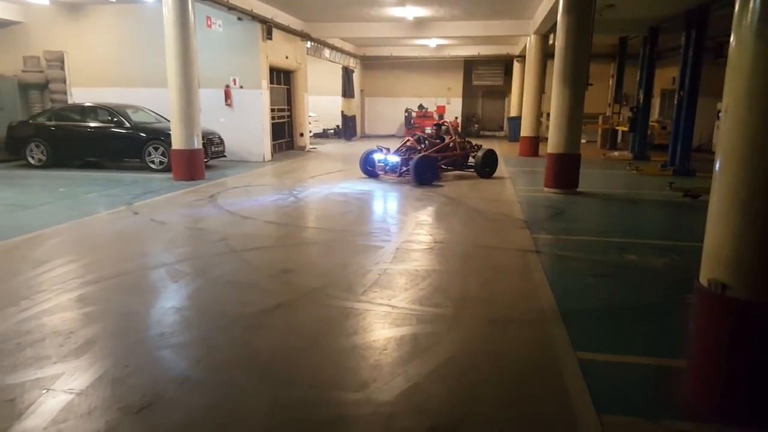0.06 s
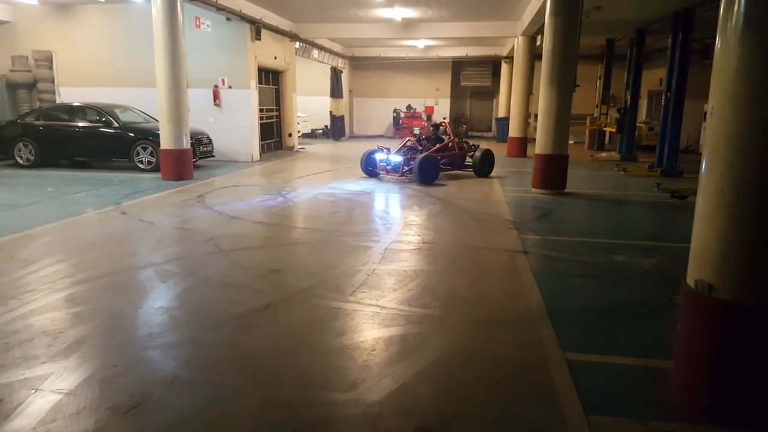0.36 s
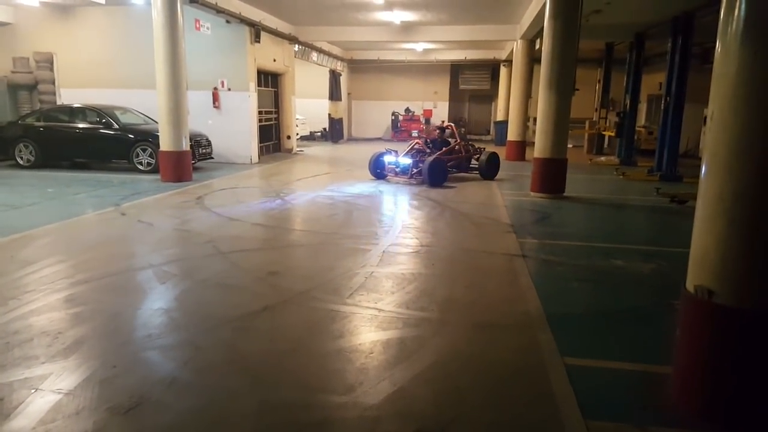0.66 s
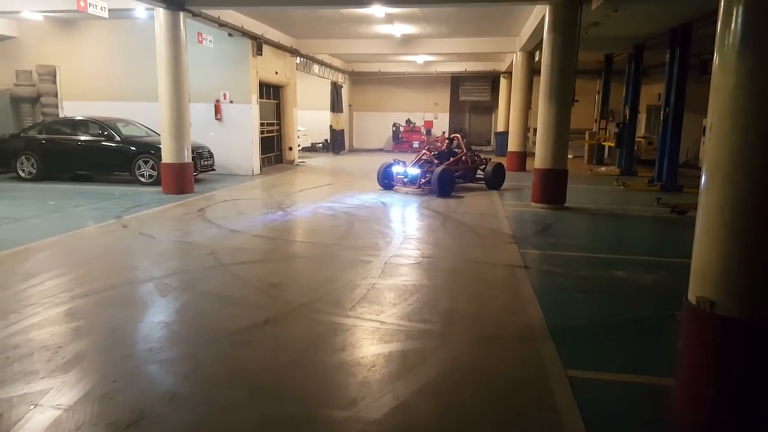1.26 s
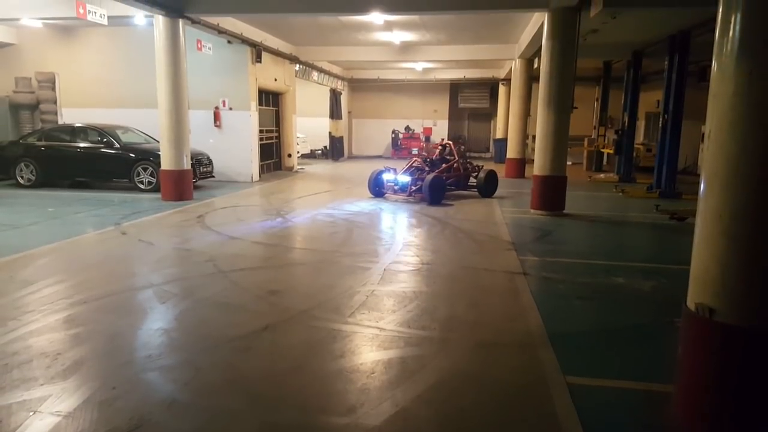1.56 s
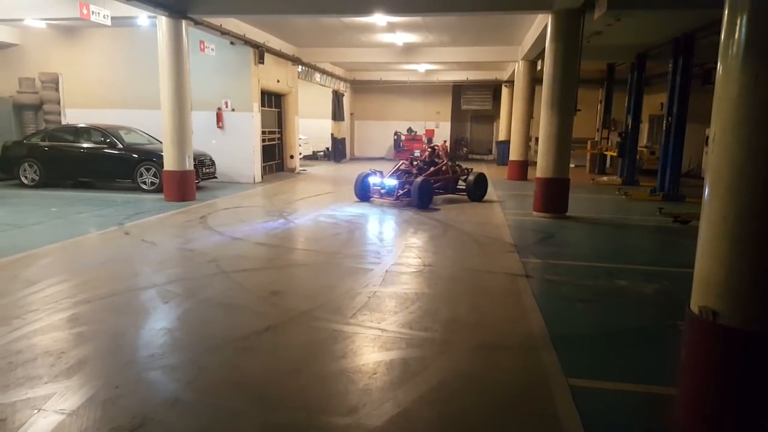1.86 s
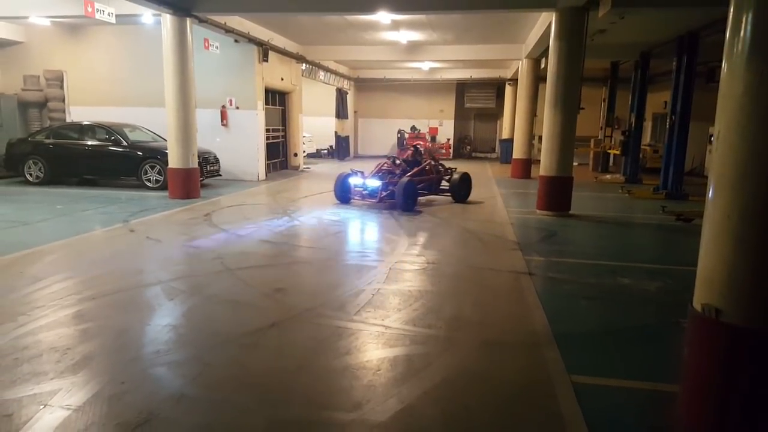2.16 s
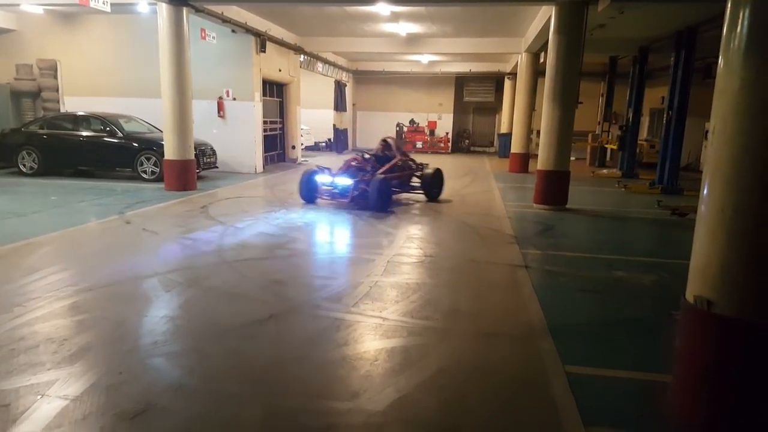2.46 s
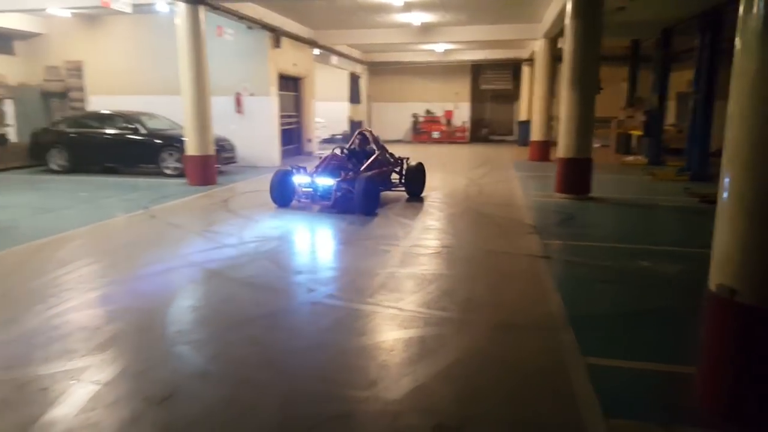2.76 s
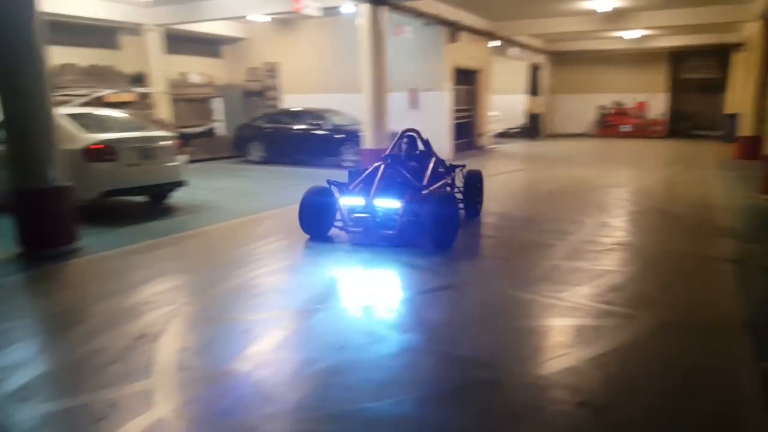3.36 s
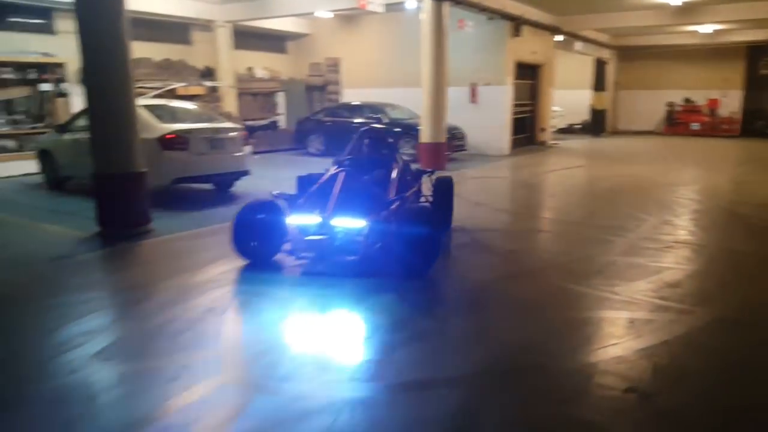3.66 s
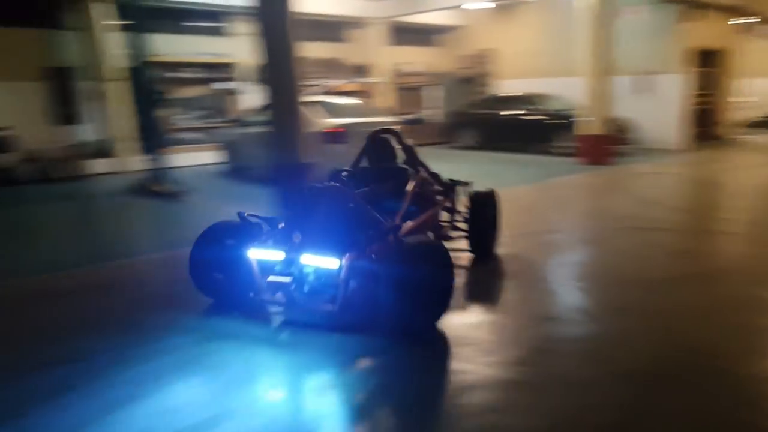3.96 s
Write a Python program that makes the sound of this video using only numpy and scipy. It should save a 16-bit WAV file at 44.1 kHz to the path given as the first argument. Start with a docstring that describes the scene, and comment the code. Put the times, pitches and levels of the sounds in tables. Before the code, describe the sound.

A buggy engine idles lumpily in a concrete garage, then barks and revs up, growing louder. Its tyres chirp and break into a shrill, wavering squeal as it turns towards the microphone, everything echoing.

```python
"""A lumpy four-cylinder idle fills a concrete garage while an earlier tyre squeal rings away.
The open buggy barks as its throttle opens, then revs up and grows louder, its firing pulses
booming and rasping in the exhaust over clatter and hiss. Pulling away in a tight turn, its tyres
stick and slip on the smooth floor: pure chirps and a shrill, wavering squeal that the hard room
smears into a band, with rubber scrub rising underneath."""
import sys
import numpy as np
from scipy import signal
from scipy.fft import rfft, irfft, next_fast_len
from scipy.io import wavfile
from scipy.ndimage import uniform_filter1d, minimum_filter1d

SR = 44100
rng = np.random.default_rng(int(sys.argv[2]) if len(sys.argv) > 2 else 0)


def dump(signal):
    """Clip the signal to [-1, 1] and save it as 16-bit WAV at the path in sys.argv[1]."""
    limited = np.clip(np.atleast_2d(signal).T, -1, 1)
    pcm = np.round(limited * 32767).astype(np.int16)
    wavfile.write(sys.argv[1], SR, pcm)


N = 176400

# rev curve: t/s, firing rate f/Hz, firing tone level/dB, octave level/dB
REVS = [(0, 59.03, -32, -47), (.42, 49.75, -40, -36), (1.0, 49.99, -34, -42), (1.4, 52.34, -34, -21),
        (1.6, 56.1, -44, -24.5), (2.04, 63.84, -32, -24), (2.13, 68.06, -30, -16), (2.2, 74, -31.5, -26),
        (2.3, 79.94, -29.5, -26.5), (2.6, 96, -28.5, -19), (2.83, 113.1, -20, -25.5),
        (2.95, 108.1, -29, -26.5), (3.22, 104.7, -10.5, -18.5), (3.42, 106.8, -24.5, -18),
        (3.7, 110, -21.5, -27), (4, 116.9, -13.5, -26.5)]
# accent of each cylinder in firing order: level/dB
CYLINDER_ACCENTS = [0.5, -5, 0.5, 1]
# engine harmonics that flare briefly: t/s, multiple of the firing rate, level/dB
FLARES = [(2.91, 5, -15), (3.08, 3, -18.5), (3.635, 5, -17.5), (3.726, 5, -16), (3.855, 3, -14.5)]
# exhaust boom envelope: t/s, level/dB
BOOM_ENVELOPE = [(0, -25.5), (.8, -24.5), (1.12, -21.5), (1.44, -16), (1.62, -16), (1.78, -24.5),
                 (2.3, -20), (4, -33.5)]
# engine load, ahead of the trims: t/s, rasp level/dB, clatter level/dB
LOAD = [(0, -34.5, -37.5), (.8, -36, -39), (1.42, -24, -29), (1.8, -28.5, -38), (2.05, -25.5, -35.5),
        (2.42, -15.5, -31), (2.95, -12.5, -27), (3.25, -16.5, -28), (4, -14.5, -27)]
# treble hiss envelope: t/s, level/dB
HISS_ENVELOPE = [(0, -60), (.55, -65), (.68, -52), (.95, -66.5), (1.42, -47.5), (1.8, -56.5), (4, -55)]
# EQ curves of exhaust boom, exhaust rasp, mechanical clatter and hiss: f/Hz, level/dB
BOOM_EQ = [(22, -31.5), (55, -3), (100, -2), (155, 3.5), (195, -5.5), (260, -7.5), (3000, -130)]
RASP_EQ = [(120, -48), (240, -5), (330, 0.5), (550, -1), (760, -6.5), (900, -18), (4000, -76)]
CLATTER_EQ = [(200, -28.5), (700, 0.5), (1800, 0), (4300, -10.5), (7900, -31), (9500, -46.5),
              (16000, -55.5)]
HISS_EQ = [(5000, -0.5), (8000, 4.5), (9500, -11.5), (11500, -1), (15500, -7.5)]
# bands of the squeal dying in the room: centre f/Hz, half-width/Hz, starting level/dB
TAIL_BANDS = [(2540, 49, -33.5), (2800, 26, -35.5), (2975, 74, -32.5), (1020, 270, -32)]
# tread chirps: t/s, f/Hz, level/dB
CHIRPS = [(.145, 2890, -25), (1.468, 2646, -12), (1.525, 2593, -13), (1.655, 2845, -22),
          (1.746, 2530, -7.5), (1.849, 2748, -12.5), (1.979, 2728, -11)]
# exhaust pipe resonance: t/s, f/Hz, level/dB
PIPE_RING = [(.95, 123.7, -55), (1.25, 129.1, -16), (1.41, 136.9, -14), (1.8, 147, -58)]
# squeal of the sliding tyres: t/s, f/Hz, level/dB
SLIDE = [(1.36, 2330, -84), (1.445, 2437, -18), (1.52, 2554, -9.5), (1.65, 2513, -10), (1.9, 2492, -12),
         (2.03, 2438, -13.5), (2.22, 2461, -13), (2.42, 2451, -18), (2.75, 2480, -16.5), (4, 2654, -19.5)]
# tread ribs: pitch ratio, relative level/dB, octave level/dB against the rib, breaks loose at t/s
TREAD_RIBS = [(0.959, -21, -6, 1.9), (1.0, -5.5, -18, 1.36), (1.04, -4.5, -24, 1.36),
              (1.11, -7, -25.5, 1.42), (1.17, -11, -33, 1.56)]
# rubber scrubbing the floor: t/s, centre f/Hz, level/dB
SCRUB = [(2, 3096, -60.5), (3.55, 4424, -36.5)]
# stereo image of the room: f/Hz, left-right correlation
STEREO_CORRELATION = [(170, 1), (640, 0.66), (1500, 0.08)]
# microphone balance: f/Hz, left-over-right level/dB
BALANCE = [(600, 2), (2700, 0.5), (8100, -7), (15000, -12)]

LUMPY_BELOW_HZ, SMOOTH_ABOVE_HZ = 42, 89   # firing rates between which the deep thump fades
THUMP_EDGE_HZ, RASP_TRIM_DB, CLATTER_TRIM_DB = 87, -1.5, 3
RIB_ATTACK_S, SCATTER_GROWTH_PER_S = .079, .0115   # pitch scatter widens as the car speeds up
ROOM_T60_S, EARLY_T60_S, EARLY_DB = 1.23, .23, -8


def from_db(db):
    """Decibels to gain."""
    return 10 ** (np.asarray(db) / 20)


def unit_power(x):
    """Normalise to an RMS of 1."""
    return x / np.sqrt(np.mean(x ** 2) + 1e-20)


def levelled(x):
    """Ride the gain to hold the slow level at unit power."""
    return x / np.sqrt(uniform_filter1d(np.mean(x ** 2, axis=0), size=7000) + 1e-12)


def automation(rows):
    """One curve over time for each column after the first."""
    times, *columns = np.transpose(rows)
    return [np.interp(np.arange(N) / SR, times, column) for column in columns]


def at_bins(points, size):
    """A table over log frequency, read at the bins of a spectrum."""
    hz, value = np.transpose(points)
    return np.interp(np.log(np.fft.rfftfreq(size, 1 / SR) + 1), np.log(hz), value)


def drift(rate_hz):
    """Smooth random wander of spread 1."""
    pole = np.exp(-20 * np.pi * rate_hz / SR)   # runs at a tenth of the sample rate
    slow = signal.lfilter([1], [1, -2 * pole, pole * pole], rng.standard_normal(N // 10 + 4002))[4000:]
    return np.interp(np.arange(N) / 10, np.arange(len(slow)), unit_power(slow))


def swell(centre_s, length_s):
    """A bell-shaped envelope, length_s wide at half its height."""
    return .5 ** (((np.arange(N) / SR - centre_s) / (length_s / 2)) ** 2)


def diffuse(size):
    """Spectrum of stereo noise, centred in the bass and wide in the treble."""
    mid, side = rfft(rng.standard_normal((2, size)))
    alike = np.clip(at_bins(STEREO_CORRELATION, size), -1, 1)
    return np.sqrt(1 + alike) * mid + np.sqrt(1 - alike) * side * np.array([[1], [-1]])


def noise_band(centre_hz, half_width_hz):
    """A band of diffuse noise at unit power."""
    hz = np.fft.rfftfreq(N, 1 / SR)
    return unit_power(irfft(diffuse(N) / (1 + ((hz - centre_hz) / half_width_hz) ** 2), N))


def garage(x, direct_db, eq=None):
    """Concrete reverb: direct sound, early reflections and a long tail, with an optional EQ over all."""
    t, size = np.arange(SR) / SR, next_fast_len(N + SR)
    decay = from_db(-60 * t / ROOM_T60_S) + from_db(EARLY_DB - 60 * t / EARLY_T60_S)
    echoes = rfft(irfft(diffuse(SR)) * decay, size)
    room = echoes / np.sqrt(np.mean(np.abs(echoes) ** 2)) + from_db(direct_db)
    room /= np.sqrt(uniform_filter1d(np.mean(np.abs(room) ** 2, axis=0), size=140))   # neutral tone
    if eq is not None:
        room *= from_db(at_bins(eq, size))
    return irfft(rfft(x, size) * room, size)[:, :N]


def firings(cycles, uneven_db, jitter_s):
    """One pulse per firing, accented by cylinder and loose in strength and timing."""
    onsets = np.flatnonzero(np.diff(np.floor(cycles)))
    timing, strength = rng.standard_normal((len(onsets), 2)).T
    when = np.clip(onsets + jitter_s * SR * timing, 0, N - 1).astype(int)
    pulses = np.zeros(N)
    pulses[when] = from_db(np.resize(CYLINDER_ACCENTS, len(onsets)) + uneven_db * strength)
    return unit_power(pulses)


def engine_hum(cycles, firing_db, octave_db):
    """The firing tone and its octave waver while higher harmonics flare briefly."""
    phase = 2 * np.pi * cycles
    tones = from_db(firing_db + 2 * drift(15)) * np.sin(phase)
    tones += from_db(octave_db + 3.6 * drift(7.7)) * np.sin(2 * phase + .27 * drift(11))
    for at_s, multiple, db in FLARES:
        tones += from_db(db) * swell(at_s, length_s=.056) * np.sin(multiple * phase)
    return np.sqrt(2) * tones


def exhaust_boom(cycles, firing_hz, puffs):
    """Ragged exhaust pulses boom, losing their deep thump as the revs climb."""
    pulses = firings(cycles, uneven_db=5, jitter_s=.0014)
    boom = garage(pulses + puffs, direct_db=-4, eq=BOOM_EQ)
    thump = signal.sosfiltfilt(signal.butter(4, THUMP_EDGE_HZ, fs=SR, output="sos"), boom)
    smoothness = np.clip((firing_hz - LUMPY_BELOW_HZ) / (SMOOTH_ABOVE_HZ - LUMPY_BELOW_HZ), 0, 1)
    return from_db(automation(BOOM_ENVELOPE)[0]) * levelled(boom - smoothness * thump)


def engine():
    """One firing rhythm drives hum, exhaust boom and rasp, mechanical clatter and hiss."""
    firing_hz, firing_db, octave_db = automation(REVS)
    rasp_db, clatter_db = automation(LOAD)
    cycles = np.cumsum(firing_hz * (1 + .01057 * drift(8.6))) / SR
    hum = engine_hum(cycles, firing_db, octave_db)
    puffs = unit_power(rng.standard_normal(N) * np.exp(np.cos(2 * np.pi * cycles)))   # one per firing
    boom = exhaust_boom(cycles, firing_hz, puffs)
    tight_pulses = firings(cycles, uneven_db=3, jitter_s=.00018)
    rasp = garage(tight_pulses + from_db(-4.5) * puffs, direct_db=-15, eq=RASP_EQ)
    clatter = garage(puffs, direct_db=-10.5, eq=CLATTER_EQ)
    hiss = garage(puffs, direct_db=-22, eq=HISS_EQ)
    surge_db = 1.1 * drift(13)
    rasp = from_db(rasp_db + RASP_TRIM_DB + surge_db) * levelled(rasp)
    clatter = from_db(clatter_db + CLATTER_TRIM_DB + surge_db / 2) * levelled(clatter)
    hiss = from_db(automation(HISS_ENVELOPE)[0]) * levelled(hiss)
    return hum + boom + rasp + clatter + hiss


def squeal_tail(decay_db_per_s=23):
    """Narrow bands of an earlier squeal ring out in the room."""
    bands = sum(from_db(db) * noise_band(hz, half_width) for hz, half_width, db in TAIL_BANDS)
    return bands * from_db(-decay_db_per_s * np.arange(N) / SR)


def tread_chirps(length_s=.029):
    """A tread block catches and rings briefly on one pure pitch."""
    t = np.arange(N) / SR
    rings = sum(from_db(db) * swell(at_s, length_s) * np.sin(2 * np.pi * hz * t)
                for at_s, hz, db in CHIRPS)
    return garage(rings, direct_db=2.5)


def whistle(level_db=-66.5):
    """A thin, very high whistle that fades before the car pulls away."""
    envelope = from_db(level_db) * swell(centre_s=.34, length_s=.45)
    return envelope * noise_band(centre_hz=10500, half_width_hz=140)


def pipe_bark():
    """The exhaust pipe rings at its own pitch as the throttle opens."""
    hz, level_db = automation(PIPE_RING)
    phase = 2 * np.pi * np.cumsum(hz * (1 + .022 * drift(14))) / SR
    return np.sqrt(2) * from_db(level_db) * np.sin(phase)


def tyre_squeal(third_harmonic_db=-44):
    """Each tread rib sticks and slips at its own unsteady pitch, with overtones."""
    hz, level_db = automation(SLIDE)
    t = np.arange(N) / SR
    ribs = np.zeros(N)
    for ratio, rib_db, octave_db, start_s in TREAD_RIBS:
        wander = .9 * drift(18) + .445 * drift(217.3)   # waver plus fast grit
        phase = 2 * np.pi * np.cumsum(hz * ratio * (1 + SCATTER_GROWTH_PER_S * t * wander)) / SR
        tone = np.sin(phase) + from_db(octave_db) * np.sin(2 * phase)
        tone += from_db(third_harmonic_db) * np.sin(3 * phase)
        attack = np.clip((t - start_s) / RIB_ATTACK_S, 0, 1) ** 2
        ribs += attack * from_db(rib_db + 3.8 * drift(26)) * tone
    return garage(from_db(level_db) * levelled(ribs[None])[0], direct_db=-12.5)


def tyre_scrub():
    """Rubber rubs over the floor, louder and higher with speed."""
    hz, level_db = automation(SCRUB)
    band = signal.hilbert(noise_band(hz.mean(), half_width_hz=190))
    frequency_shift = np.exp(2j * np.pi * np.cumsum(hz - hz.mean()) / SR)
    return from_db(level_db) * np.real(band * frequency_shift)


def scene():
    """Engine and tyres in the garage, mixed under a 4 ms fade-in."""
    fade_in = np.minimum(np.arange(N) / (.004 * SR), 1)
    motor = engine() + pipe_bark()
    tyres = tyre_squeal() + tread_chirps() + tyre_scrub() + squeal_tail()
    return fade_in * (motor + tyres + whistle())


def record(dry):
    """The left microphone is fuller, the right brighter; a limiter eases peaks and the top is cut."""
    ceiling, cutoff_hz = .95, 15700
    tilt_db = at_bins(BALANCE, 2 * N) * np.array([[.5], [-.5]])
    stereo = irfft(rfft(dry, 2 * N) * from_db(tilt_db))[:, :N]
    peaks = np.maximum(np.abs(stereo).max(axis=0), ceiling)
    gain = minimum_filter1d(ceiling / peaks, size=800)
    limited = stereo * uniform_filter1d(uniform_filter1d(gain, size=400), size=400)
    return signal.sosfilt(signal.ellip(10, .1, 80, cutoff_hz, fs=SR, output="sos"), limited)


dry = scene()
out = record(dry)
dump(out)
```